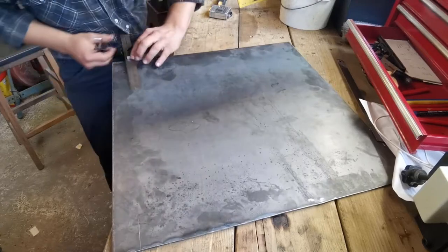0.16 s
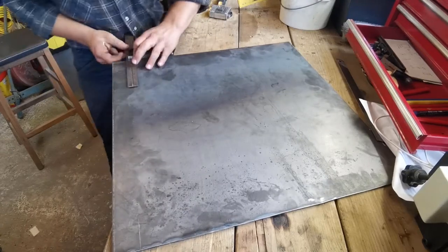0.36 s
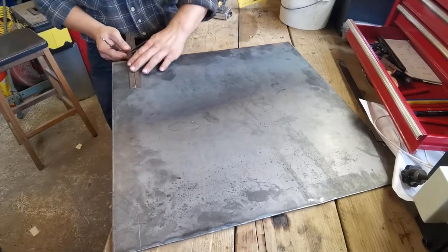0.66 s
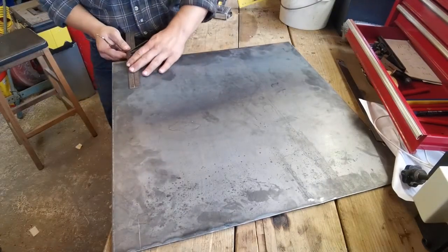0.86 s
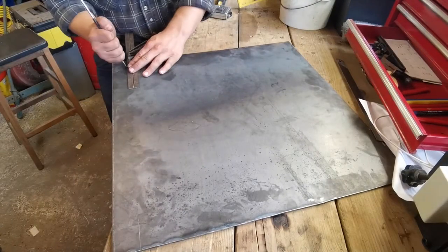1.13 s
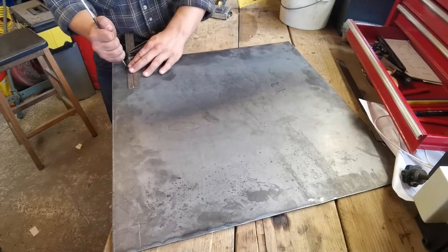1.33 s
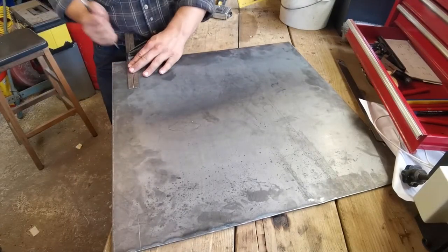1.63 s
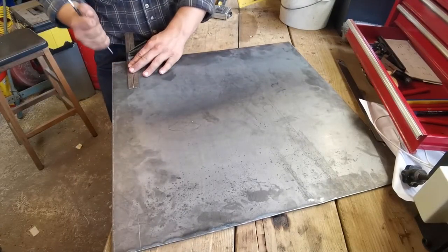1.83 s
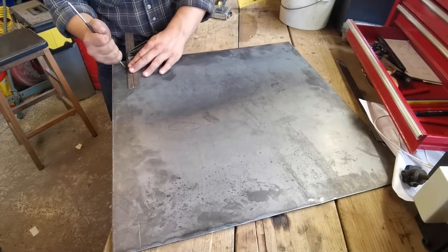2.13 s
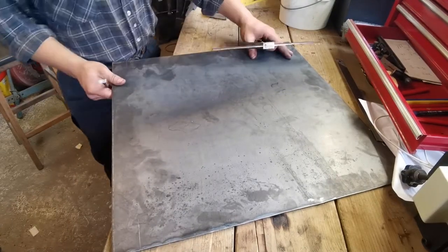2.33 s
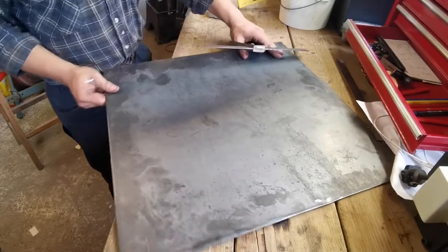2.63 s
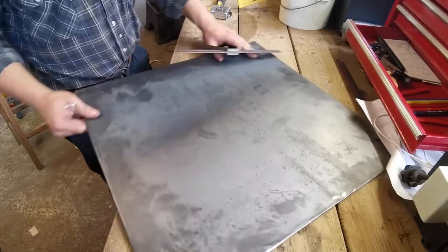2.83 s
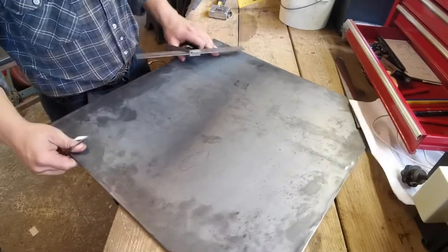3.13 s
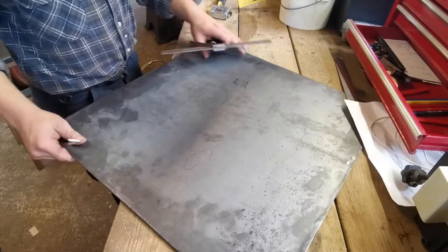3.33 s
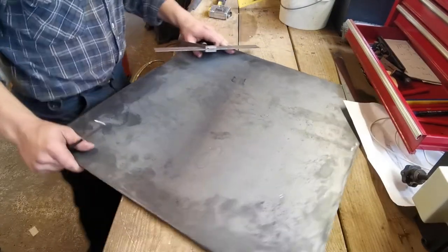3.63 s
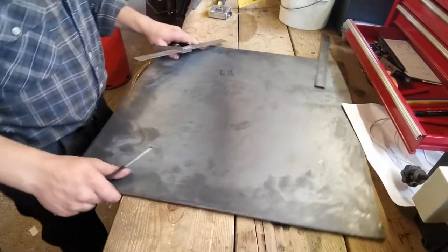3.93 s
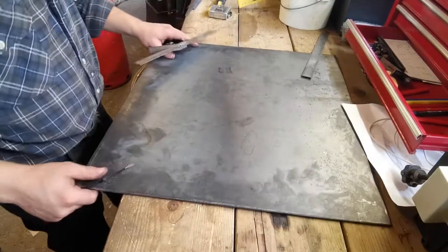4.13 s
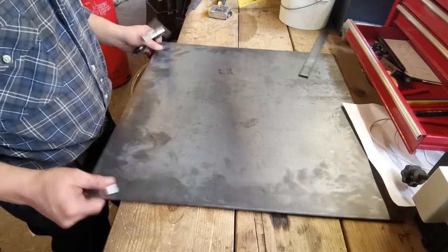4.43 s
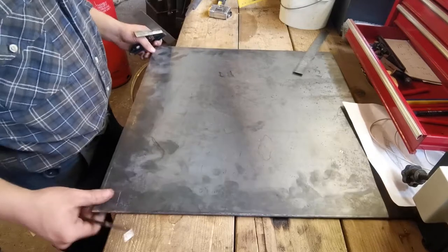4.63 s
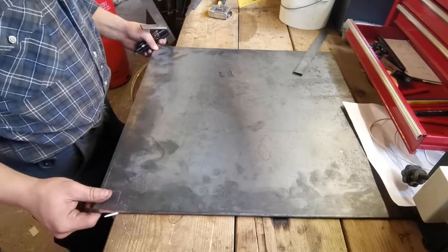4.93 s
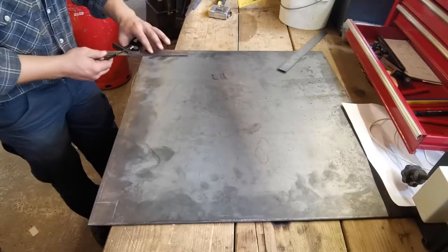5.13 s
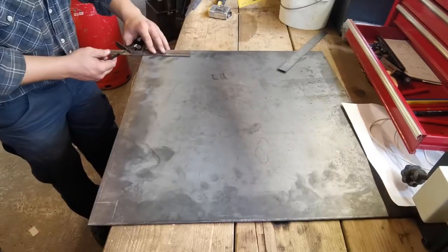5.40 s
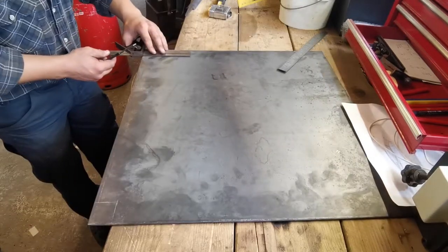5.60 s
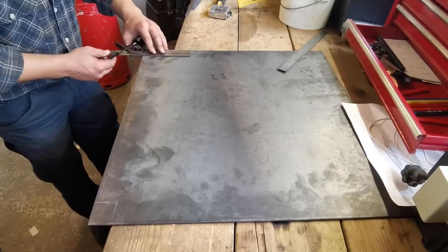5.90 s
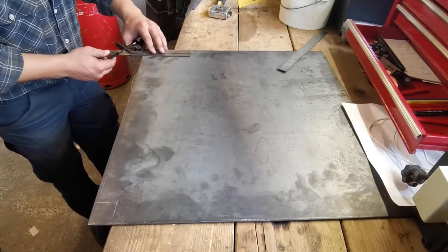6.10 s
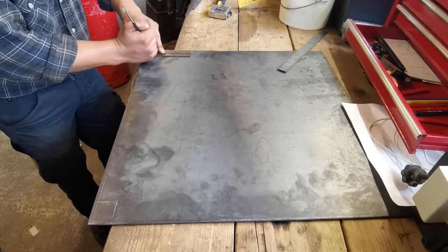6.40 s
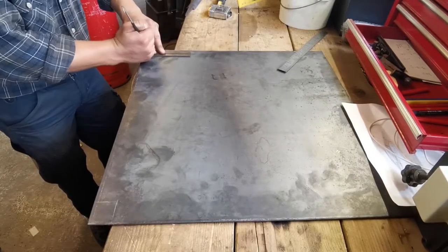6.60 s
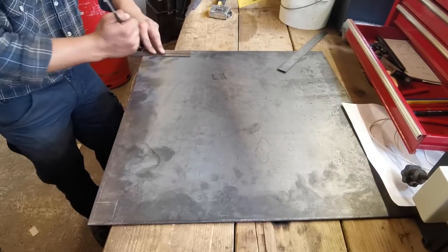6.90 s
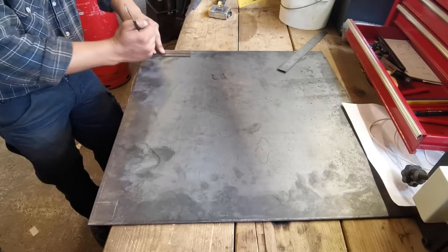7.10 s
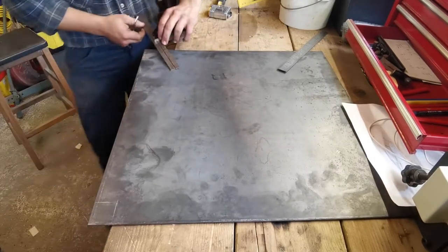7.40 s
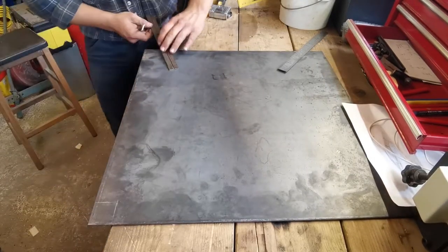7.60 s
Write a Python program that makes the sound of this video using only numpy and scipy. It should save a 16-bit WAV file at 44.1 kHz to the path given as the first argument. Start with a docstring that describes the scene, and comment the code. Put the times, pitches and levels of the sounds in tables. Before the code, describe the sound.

Small ringing clinks, light taps and short scrapes come from a steel square and scriber working on a metal sheet. Between two brief, gritty scoring strokes, the sheet scrapes over a wooden bench three times and lands with a thud. More clacks and a slide close the work. It is heard in stereo from a couple of metres, over soft workshop hush and a low electrical hum.

```python
"""A quiet workshop, stereo camera microphone two metres from a steel sheet on a wooden bench.
First a steel square is knocked and slid on the sheet; near 1.6 s a scriber scores it, catching on the
burr. From 2.6 s the sheet is dragged round in three pulls, and at 4.7 s it drops and the bench booms.
The square clacks again, a second line is scored near 6.7 s, and a few knocks and slides end the work.
Every blow and stick-slip scrape rings the sheet's dense modes, over room hush and mains hum."""
import sys
import numpy as np
from scipy import signal
from scipy.fft import rfft, irfft, next_fast_len
from scipy.io import wavfile
from scipy.ndimage import uniform_filter1d

SR = 44100
rng = np.random.default_rng(int(sys.argv[2]) if len(sys.argv) > 2 else 0)


def write(x):
    x = np.atleast_2d(x).T
    wavfile.write(sys.argv[1], SR, np.round(np.clip(x, -1, 1) * 32767).astype(np.int16))


N = 341773
PLACES = 4  # contact places on the sheet
TOP_HZ = 16000  # upper edge of the dense modes and of the recorder

# The sheet's colour from the microphone position. Each row: frequency in Hz, relative level in dB.
SHEET_COLOUR = [(82, -30), (140, -18.5), (178, -2), (316, -6), (393, -2.5), (868, -3.5), (997, -3),
                (1740, -8.5), (2280, -4.5), (2600, -6), (3090, -4.5), (4000, -8), (6960, -17.5),
                (7840, -10), (8830, -19.5), (13700, -27.5), (16000, -43)]
# The sheet's damping. Each row: frequency in Hz, typical time to fall 60 dB (t60) in seconds.
SHEET_DECAY = [(100, 0.37), (1000, 0.14), (4000, 0.12), (16000, 0.093)]
# Left-right balance of the microphone: the right side resonates near 4.5 and 7.8 kHz, the left near
# 10.5 kHz. Each row: frequency in Hz, left minus right in dB.
MIC_BALANCE = [(100, -0.5), (250, 1), (1000, 0), (1800, 0.5), (2250, -2), (2800, 0.5), (3900, -1.5),
               (4520, -7.5), (5200, 1.5), (6500, -5), (7200, -6), (7780, -12), (8700, -1), (10500, 10.5),
               (12000, 3.5), (15000, 2)]
# Hard knocks. Each row: start in seconds, crack (mids) in dB, thud (lows) and tick (highs) in dB above
# the crack, the note that the place favours in Hz, its level in dB.
HARD_KNOCKS = [(0.0183, -36, -14, 12, 414, -44.5), (.185, -17.5, 0, -15, 189, -33.5),
               (0.324, -30.5, 5, -4.5, 676, -32.5), (0.3855, -30.5, 6.5, -0.5, 202, -36.5),
               (0.5733, -20.5, -22, -13, 693, -36.5), (0.64, -27, -22.5, 3.5, 422, -37.5),
               (2.363, -16, -6.5, -37, 1068, -22), (2.8485, -29, -3, -17, 974, -29.5),
               (3.399, -23, -10.5, -0.5, 231, -39), (3.547, -27.5, -14, -17, 610, -35.5),
               (4.201, -32.5, 5, -12, 205, -34), (4.6662, -22, 8.5, -7.5, 261.5, -18.5),
               (4.671, -32.5, 7.5, -12, 760, -25), (4.696, -38, 7, -9, 500, -34.5),
               (5.012, -22, -8, 2, 400.4, -25.5), (5.115, -32.5, -4.5, -0.5, 394, -40),
               (5.334, -25.5, -5, -0.5, 480, -44), (5.557, -41.5, -8, -6, 1104, -46),
               (5.5889, -45.5, -2, -1, 1158, -49.5), (7.335, -26.5, -13.5, 6, 405, -41.5),
               (7.3712, -34, -8, 7.5, 430.2, -43), (7.579, -28, -9, -5, 4880, -42.5)]
# Fingers and tool tips. Each row: start in seconds, crack in dB, thud and tick in dB above the crack.
LIGHT_TAPS = [(0.936, -60, 3, -8), (1.067, -72, -3, 4), (1.2131, -61, -9, 1), (1.28, -58.5, -5, -6),
              (1.4812, -60, -20, -4), (1.5606, -42, -5, -1), (2.7316, -42, -9, 11), (3.526, -42, -4, -22),
              (4.7666, -49.5, 1, 8.5), (5.78, -64, -20, 5), (5.665, -52, -13, -8),
              (5.7214, -46.5, -12, -14), (5.731, -50.5, -5, -9), (5.8129, -40.5, -27, -3),
              (5.893, -54, -24, 8), (6.038, -56.5, -13, 7), (6.246, -62, -8.5, 7.5),
              (6.3547, -55.5, -10, -3), (6.4296, -58, -10, -3), (6.597, -45.5, 0.5, -11),
              (6.6057, -46.5, -3, 1), (6.653, -40.5, -6, -6), (7.22, -73, -20, 3), (7.525, -52, -13, 8),
              (7.551, -56, -15, 12)]
# The scriber catching on the burr. Each row: start in seconds, crack in dB, note in Hz, note in dB.
BURR_CATCHES = [(1.615, -46, 7000, -44), (1.624, -35, 5330, -41), (1.63, -42, 517, -40),
                (1.648, -38, 474, -31), (1.6727, -23, 2200, -32), (1.681, -19, 4597, -26),
                (1.689, -25, 3100, -29.5), (6.6755, -46, 3120, -50), (6.7197, -44, 3110, -46.5),
                (6.758, -25.5, 7000, -40), (6.781, -19.5, 5480, -33.5), (6.795, -23.5, 2526, -24.5),
                (6.808, -19.5, 3050, -29.5), (6.822, -33.5, 2500, -32)]
# Tools sliding on the sheet. Each row: touch, full pressure and lift in seconds, scrape in dB when full
# and at the lift, rumble and hiss in dB above the scrape.
TOOL_STROKES = [(0.017, 0.023, 0.17, -43, -47.5, -2.5, 0), (0.066, 0.139, 0.2, -45, -46, 5, 0),
                (0.172, 0.238, 0.41, -41, -50, -3, 7.5), (0.21, 0.28, 0.47, -31.5, -49.5, -3, -9),
                (0.5, 0.569, 0.74, -34, -47, -1.5, -5), (1.06, 1.11, 1.16, -79, -76, -14, 2),
                (1.243, 1.3, 1.29, -60.5, -63, 2.5, 2.5), (1.465, 1.49, 1.72, -62, -62.5, -11, 1.5),
                (1.53, 1.643, 1.673, -39.5, -35.5, -1, 3.5), (2.362, 2.375, 2.437, -31.5, -48, 2, -13.5),
                (2.43, 2.509, 2.573, -36.5, -53.5, -2.5, -11), (3.4, 3.411, 3.49, -43.5, -58.5, -2, 6),
                (4.68, 4.682, 5.21, -44, -130, 10.5, -3), (5.02, 5.039, 5.36, -39.5, -61.5, -7.5, 1),
                (5.14, 5.29, 5.33, -40, -39, -3.5, -6.5), (5.56, 5.593, 5.72, -56, -63.5, 0.5, -1),
                (5.82, 5.825, 5.8, -79, -86, -18.5, 17.5), (6.251, 6.267, 6.9, -72.5, -79, -3.5, -0.5),
                (6.33, 6.371, 6.2, -69, -76, 0.5, 7), (6.5, 6.627, 6.65, -56, -62, -1, -1.5),
                (6.653, 6.69, 6.87, -49.5, -43.5, -2.5, -3), (6.697, 6.798, 6.845, -34, -42.5, -4.5, 0.5),
                (6.828, 6.83, 6.93, -50, -57, 0.5, -2.5), (7.346, 7.378, 7.52, -44.5, -53, -10, -1.5),
                (7.543, 7.602, 7.67, -28.5, -52.5, -9.5, -10), (7.647, 7.743, 7.6, -43.5, -47, 4.5, -7.5)]
# The sheet dragged over the bench, one list per pull.
# Each row: time in seconds, scrape in dB, rumble and hiss in dB above the scrape.
SHEET_PULLS = [
    [(2.62, -76, 3, -3), (2.634, -65, 8, -5), (2.73, -39, -3, -6.5), (2.884, -34.5, 0, -6.5),
     (3.188, -34.5, -5, -3), (3.31, -39.5, -2, -2), (3.39, -54.5, 4, -4)],
    [(3.555, -41, 8, -21), (3.627, -42.5, -3.5, -5.5), (3.705, -32, -9, -5.5), (3.995, -31.5, -3.5, -6.5),
     (4.155, -43.5, 1.5, -2), (4.259, -34, -2.5, -15.5), (4.42, -79.5, 8.5, 0)],
    [(4.42, -72, 5, 2.5), (4.446, -72, -5.5, -6), (4.502, -51.5, -4.5, -6), (4.594, -36.5, -2, -4.5),
     (4.62, -41.5, -3.5, -1), (4.646, -39, -0.5, -9), (4.66, -67.5, 14, 18)],
]
# Free rings of the sheet's clearest notes, the square's blade and stock, its clack on the sheet, and the
# scriber. Each row: frequency in Hz, relative level in dB, t60 in seconds, left minus right in dB.
SHEET_MODES = [(174.3, -10, .5, 0.5), (219.9, -5, 0.63, 0), (372.5, -8, 0.17, 1), (430, -9.5, .2, 0),
               (485, -7, 0.18, 0), (662, -5.5, 0.18, 0), (808, -12, 0.19, -0.5), (978, -9.5, .2, -0.5),
               (1188, -8.5, 0.12, 1.5), (1260, -8.5, 0.069, -2.5), (1540, -16, 0.17, -1),
               (1840, -12.5, 0.22, -1.5), (2240, -14, 0.3, -8), (2630, -14, 0.19, -2.5)]
BLADE_MODES = [(4020, -16, 0.5, 0), (4073, -0.5, .24, 4), (4300, -12.5, 0.34, 2), (4880, -5, 0.23, -8.5),
               (6095, -6.5, 0.36, -2), (11285, -23.5, .2, 0)]
STOCK_MODES = [(408, -3, 0.51, 0.0014), (724, -8, 1.1, 0), (455, -10, .4, 0.00098), (3070, -4.5, 0.096, 0)]
CLACK_MODES = [(2240, -7, 0.073, 1.5), (3120, -2, .16, -1), (3730, -1.5, 0.11, -5), (4500, -5, 0.13, -11),
               (5270, -4.5, 0.11, 12.5), (5700, -10, .2, 3.5), (6000, -4.5, 0.14, 2),
               (6460, -8.5, .25, -4.5), (6850, -7, 0.43, 0), (7140, -7.5, 0.18, -6), (7770, 0, .15, -21),
               (7770, 0.5, 0.17, -13.5), (8100, -5, .16, -7.5), (10530, -3, .12, 14)]
SCRIBER_MODES = [(3794, -3, .27, -3), (5583, 0, .32, 0), (8096, -17, 1.5, -15), (8218, -27, 1.0, -11),
                 (8627, -34, .7, -13), (10589, -38, 1.0, 6)]
# The blows that start those rings. Each row: start and stop in seconds, factor on t60, level in dB.
SHEET_HITS = [(.186, .3, 0.46, -30.5), (.324, .45, .6, -40), (.386, .5, .6, -43),
              (2.366, 2.497, 1.08, -25.5), (2.849, 3, .6, -45), (4.201, 4.35, 0.71, -41),
              (4.667, 4.849, 0.32, -27)]
BLADE_HITS = [(0.642, .942, 1, -29.5), (3.396, 3.54, 0.34, -45), (4.665, 5.01, 1, -42.5),
              (5.335, 5.56, 0.87, -29), (7.329, 7.583, .6, -50)]
STOCK_HITS = [(5.0107, 5.305, 0.95, -37), (7.339, 7.576, 1.26, -42)]
CLACK_HITS = [(0.018, .18, 1.1, -39.5), (3.397, 3.54, 0.89, -36), (5.01, 5.3, 1.3, -36.5),
              (5.115, 5.3, 1, -46), (5.556, 5.7, 1.1, -62), (5.72, 5.8, .7, -66), (5.812, 5.888, 0.85, -53),
              (5.891, 6.03, 0.6, -54), (6.037, 6.199, .8, -64), (7.337, 7.568, 1.3, -38.5),
              (7.372, 7.57, 1, -42)]
SCRIBER_HITS = [(0.652, 0.944, 1.12, -28), (1.69, 2.2, 0.36, -40), (4.66, 5.02, 0.59, -48)]
# Metal rings that follow one blow only. Each row: start and stop in seconds, frequency in Hz,
# level in dB, t60 in seconds, left minus right in dB.
LONE_PINGS = [(3.40, 3.54, 2290, -30, .12, 0), (3.40, 3.54, 3100, -35, .15, 0),
              (3.40, 3.54, 3350, -26, .07, 0), (3.40, 3.54, 5303, -31, .1, 0),
              (4.667, 5.01, 2364, -55, 1.0, 13), (5.333, 5.555, 9281, -42, .17, 13),
              (5.333, 5.555, 10149, -47, .2, 13), (6.81, 7.2, 7862, -39, .37, -20),
              (6.81, 7.2, 11285, -44, .3, 0)]
# The square's low modes, plus broad treble resonances of microphone and room that scrapes and knocks
# excite. Each row: frequency in Hz, width in Hz, relative level in dB.
DRIVEN_PEAKS = [(405, 20, 0), (455, 25, -5), (728, 14, -5), (2240, 45, 1), (2520, 70, 0), (3120, 55, 0),
                (4520, 140, -4), (5770, 150, -5), (6950, 200, -7), (7870, 160, -2)]
# How hard those peaks are driven as the work goes on.
# Each row: start in seconds, drive of the treble peaks in dB, drive of the square's low modes in dB.
PEAK_DRIVE = [(0, -3, -7.5), (.99, 1.5, 7), (2.356, -25, -27.5), (3.39, -1, -20), (3.54, -31, -32),
              (4.671, -3.5, -26), (5.005, -9.5, 4.5), (5.55, -22, -19), (6.549, 1, 1.5), (7.331, -1.5, 12),
              (7.39, 4, 16.5), (7.575, -4, -11)]
# The bench under heavy moves. Each row: start in seconds, frequency in Hz, level in dB.
BENCH_BOOMS = [(0.192, 76.4, -34.5), (.39, 61, -36), (1.699, 69.3, -31), (2.85, 176.5, -25),
               (3.572, 72, -38), (4.668, 70, -25), (4.667, 125, -21.5), (5.305, 196, -29),
               (6.79, 78.2, -29.5)]
# The workshop's room tone. Each row: frequency in Hz, relative spectral density in dB.
ROOM_TONE = [(15, -9), (25, -7), (70, -5), (125, -16.5), (250, -20), (500, -31), (1000, -33.5),
             (2000, -40.5), (4500, -45), (6000, -51.5), (7800, -52.5), (9000, -54), (12500, -55.5),
             (14000, -64.5)]
# Resonances of the microphone capsule. Each row: frequency in Hz, width in Hz, gain in dB.
MIC_RESONANCES = [(4615, 340, 4), (8500, 300, -4), (10610, 1100, 6.5)]


def sheet_response(f, size, count=1300, clear_note_db=4, click_db=-8, left_lag_s=.00018):
    """A plate's evenly dense modes, as spectra from each contact place to each side of the microphone."""
    t = np.arange(SR // 4) / SR
    scatter = rng.standard_normal((count, 2))
    dense_hz = 140 + (np.arange(count) + .4 * scatter[:, 0]) * TOP_HZ / count
    dense_t60 = at(SHEET_DECAY, dense_hz) * np.exp(.25 * scatter[:, 1])
    note_hz, note_db, note_t60, _ = np.transpose(SHEET_MODES)
    hz = np.r_[dense_hz, note_hz]
    t60 = np.r_[dense_t60, np.minimum(note_t60, .22)]
    base = undb(at(SHEET_COLOUR, hz) + np.r_[np.zeros(count), clear_note_db + .5 * note_db]) / np.sqrt(t60)
    # each place favours its own modes and 350 Hz regions; over all places this evens out
    gain = base * undb(4.23 * rng.standard_normal((PLACES, 1, len(hz))))
    region = hz / 350 + 50 * np.arange(PLACES)[:, None, None]
    gain *= undb(1.8 * np.interp(region, np.arange(350), rng.standard_normal(350)))
    gain *= base / np.sqrt(np.mean(gain ** 2, axis=0))
    spread = 2 * np.tanh((hz / 640) ** 2)  # short waves reach left and right with unlike phase
    phase = rng.uniform(0, 2 * np.pi, gain.shape) + spread * rng.standard_normal((PLACES, 2, len(hz)))
    modes = np.exp(np.outer(2j * np.pi * hz - np.log(1000) / t60, t).astype(np.complex64))
    ringing = rfft(((gain * np.exp(1j * phase)).astype(np.complex64) @ modes).imag, size)
    # the contact is also heard directly: a causal click of the same colour, on the right side first
    cepstrum = irfft(np.log(undb(at(SHEET_COLOUR, f))), size)
    log_click = rfft(np.r_[cepstrum[0], 2 * cepstrum[1:256]], size)
    click = np.exp(log_click - 2j * np.pi * f * np.array([[left_lag_s], [0]]))
    lean = sides(at(MIC_BALANCE, f))
    return (level(ringing, 0) + level(click, click_db)) * lean / np.sqrt(np.mean(lean ** 2, axis=0))


def sheet(force):
    """The steel sheet rung by force[band, place], the bands being lows, mids and highs."""
    size = next_fast_len(N + SR // 4)
    f = np.arange(size // 2 + 1) * SR / size
    response = sheet_response(f, size)
    spectrum = 0
    for push, (edge_hz, kind) in zip(force, [(1200, "low"), ((1200, 5500), "band"), (5500, "high")]):
        crossover = signal.butter(3, edge_hz, kind, fs=SR, output="sos")
        band = level(response * signal.sosfreqz(crossover, f, fs=SR)[1], 0)
        spectrum += (band * rfft(push, size)[:, None]).sum(axis=0)
    return irfft(spectrum, size)[:, :N]


def blows(catch_thud_db=-30.5, catch_tick_db=-19.5, push_db=21.5):
    """Force of knocks, taps and catches: short rough pushes, raised as the sheet spreads them in time."""
    force = np.zeros((3, PLACES, N))
    t = np.arange(SR // 10) / SR
    catches = [(s, db, catch_thud_db, catch_tick_db) for s, db, _, _ in BURR_CATCHES]
    for rows, contact_s in ((HARD_KNOCKS, .004), (LIGHT_TAPS, .0066), (catches, .003)):
        for start, db, thud_db, tick_db, *_ in rows:
            place = undb(8 * rng.standard_normal((PLACES, 1)))  # one place takes most of the blow
            push = place * rng.standard_normal((PLACES, len(t))) * np.exp(-t / contact_s)
            strength = undb(db + push_db + np.array([thud_db, 0, tick_db]))
            add(force, start, strength[:, None, None] * push / np.sqrt(np.sum(push ** 2)))
    return force


def rubbing(touch_db=-28.5, release_db_per_s=260, grit_db=2, drag_hiss_db=.5):
    """Stick-slip force of tools and dragged sheet: dense slips whose pressure judders and place wanders."""
    t = np.arange(N) / SR
    slips = level(rng.standard_normal((PLACES, N)) * undb(2.5 * rng.exponential(size=(PLACES, N))), 0)
    wander = np.array([walk(9) for _ in range(PLACES)])
    judder = walk(45)

    def pressure(wander_db, judder_db):
        share = undb(wander_db * wander)
        return share / np.sqrt(np.sum(share ** 2, axis=0)) * undb(judder_db * judder)

    stroke_power, drag_power = np.zeros((2, 3, N))
    for touch, full, lift, db, lift_db, rumble_db, hiss_db in TOOL_STROKES:
        span = t[int(touch * SR):int((lift + .5) * SR)]
        times = np.maximum.accumulate([touch, full, lift, lift + 1])
        scrape_db = np.interp(span, times, [db + touch_db, db, lift_db, lift_db - release_db_per_s])
        add(stroke_power, touch, undb(scrape_db + np.array([[rumble_db], [0], [hiss_db]])) ** 2)
    for pull in SHEET_PULLS:
        times, db, rumble_db, hiss_db = np.transpose(pull)
        span = t[int(times[0] * SR):int(times[-1] * SR)]
        band_db = [np.interp(span, times, db + above) for above in (rumble_db, 0, hiss_db + drag_hiss_db)]
        add(drag_power, times[0], undb(band_db) ** 2)
    grit = undb(grit_db * np.array([[0], [.5], [1]]) * walk(160))  # the hiss stutters most
    strokes = (np.sqrt(stroke_power) * grit)[:, None] * pressure(wander_db=7, judder_db=1)
    drags = (np.sqrt(drag_power) * grit)[:, None] * pressure(wander_db=6, judder_db=.6)
    return slips * (strokes + drags)


def place_notes():
    """Each knock and catch briefly sounds the note that its place on the sheet favours."""
    out = np.zeros((2, N))
    for rows, t60 in ((HARD_KNOCKS, .16), (BURR_CATCHES, .09)):
        for start, *_, hz, db in rows:
            add(out, start, undb(db) * ring(hz, t60, .4) * sides(at(MIC_BALANCE, hz))[:, None])
    return out


def free_rings(grip_s=.004):
    """Square, scriber and sheet ring on until gripped; each mode meets left and right out of step."""
    out = np.zeros((2, N))
    parts = [(BLADE_MODES, BLADE_HITS), (SCRIBER_MODES, SCRIBER_HITS), (STOCK_MODES, STOCK_HITS),
             (CLACK_MODES, CLACK_HITS), (SHEET_MODES, SHEET_HITS)]
    rings = [(start, stop, hz, db + mode_db, t60_factor * t60, pan_db)
             for modes, hits in parts
             for start, stop, t60_factor, db in hits
             for hz, mode_db, t60, pan_db in modes]
    for start, stop, hz, db, t60, pan_db in LONE_PINGS + rings:
        fade = np.clip(np.arange(int((stop - start) * SR))[::-1] / (grip_s * SR), 0, 1)
        right_lead = rng.uniform(.7, 1.4) * min(hz / 2000, 1)
        phase = np.array([[0], [right_lead]]) + np.pi * rng.integers(2)
        add(out, start, level(sides(pan_db), db)[:, None] * fade * ring(hz, t60, stop - start, phase))
    return out


def driven_resonances(force, left_lag_samples=13):
    """Scrapes and knocks excite the square's low modes and broad treble peaks of microphone and room."""
    starts, treble_db, low_db = np.transpose(PEAK_DRIVE)
    row = np.maximum(np.searchsorted(starts, np.arange(N) / SR) - 1, 0)
    drive = force.sum(axis=1) * undb([low_db, treble_db, treble_db])[:, row]
    out = np.zeros((2, N))
    for hz, width, db in DRIVEN_PEAKS:
        band = int(hz > 1200) + int(hz > 5500)
        peak = undb(db) * np.sqrt(1000 / width) * resonate(drive[band], hz, width)
        out += peak * sides(at(MIC_BALANCE, hz))[:, None]
    return np.array([np.roll(out[0], left_lag_samples), out[1]])  # the right side hears it first


def bench(t60_cycles=19.5):
    """Bench and sheet boom: a pair of low modes that swells over a cycle and dies away."""
    out = np.zeros((2, N))
    phase = np.array([[0], [.35]])
    for start, hz, db in BENCH_BOOMS:
        t60 = t60_cycles / hz
        boom = ring(hz, t60, .5, phase) + .5 * ring(1.3 * hz, .81 * t60, .5, -phase)
        swell = 1 - np.exp(-np.arange(boom.shape[1]) * hz / SR)
        add(out, start, undb(db) * boom * swell)
    return out


def workshop(hush_db=-56.5, flicker_db=3.83, hum_hz=99.6, hum_db=-59.5):
    """Room tone: octave bands of hush that flicker separately, and a wavering mains hum in the centre."""
    f = np.arange(N // 2 + 1) * SR / N
    mid, side = rfft(rng.standard_normal((2, N))) * undb(at(ROOM_TONE, f))
    side *= np.clip(f / 600 + (30 / np.maximum(f, 30)) ** 2, 0, 1)  # narrow bass, wide deep rumble
    hush = np.zeros((2, N))
    for hz in 20 * 2. ** np.arange(10):
        band = np.clip(1 - np.abs(np.log2(np.maximum(f, 20) / hz)), 0, 1)
        hush += irfft(np.array([mid + side, mid - side]) * band, N) * undb(flicker_db * walk(5.5))
    hum_phase = 2 * np.pi * np.cumsum(hum_hz + .4 * walk(3)) / SR
    return level(hush, hush_db) + np.sin(hum_phase) * undb(hum_db + 1.5 * walk(9))


def undb(db):
    """Decibels as amplitude."""
    return 10 ** (np.asarray(db) / 20)


def level(x, db):
    """x scaled to an RMS of db."""
    return x * undb(db) / np.sqrt(np.mean(np.abs(x) ** 2))


def at(table, hz):
    """A (Hz, value) table read on a log-frequency axis."""
    f, values = np.transpose(table)
    return np.interp(np.log(np.maximum(hz, 1)), np.log(f), values)


def walk(rate):
    """Random levels held 1 / rate seconds and smoothed twice; spread near 1."""
    hold = int(SR / rate)
    steps = np.repeat(rng.standard_normal(N // hold + 1), hold)
    return 1.7 * uniform_filter1d(uniform_filter1d(steps, hold), hold)[:N]


def ring(hz, t60, length_s, phase=0.):
    """A freely decaying mode."""
    t = np.arange(int(length_s * SR)) / SR
    return np.sin(2 * np.pi * hz * t + phase) * np.exp(-np.log(1000) * t / t60)


def resonate(x, hz, width_hz):
    """x through one resonance."""
    return signal.lfilter(*signal.iirpeak(hz, hz / width_hz, SR), x)


def add(track, start_s, sound):
    """Mix a sound into the track."""
    i = int(start_s * SR)
    track[..., i:i + sound.shape[-1]] += sound[..., :N - i]


def sides(pan_db):
    """Left and right gains, pan_db apart."""
    return undb(np.array([pan_db, -pan_db]) / 2)


def scene():
    """The work on the bench and the room around it, from two metres away."""
    force = blows() + rubbing()
    return sheet(force) + place_notes() + free_rings() + driven_resonances(force) + bench() + workshop()


def record(dry):
    """The microphone capsule lifts two treble bands and dips one; the recorder cuts the top."""
    for hz, width, db in MIC_RESONANCES:
        dry = dry + (undb(db) - 1) * resonate(dry, hz, width)
    return signal.sosfilt(signal.ellip(10, .2, 80, TOP_HZ, fs=SR, output="sos"), dry)


dry = scene()
out = record(dry)
write(out)
```